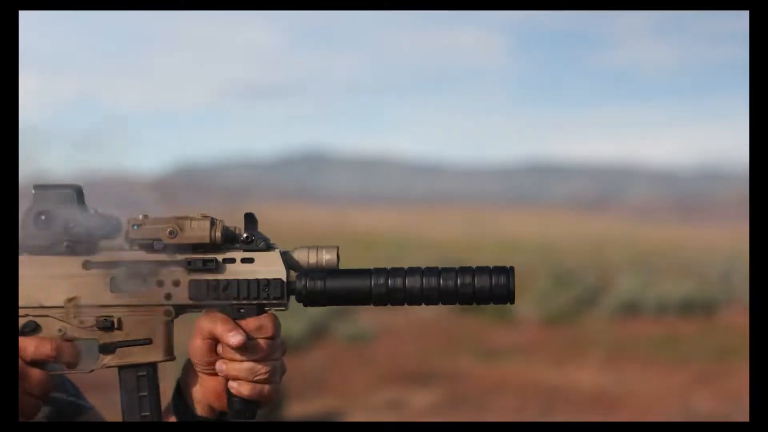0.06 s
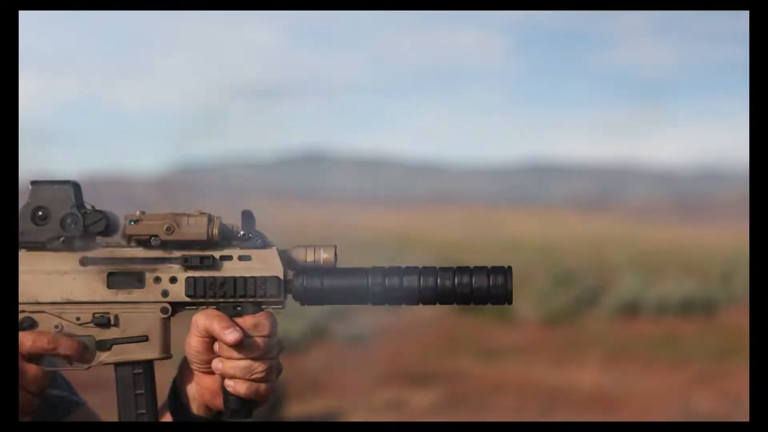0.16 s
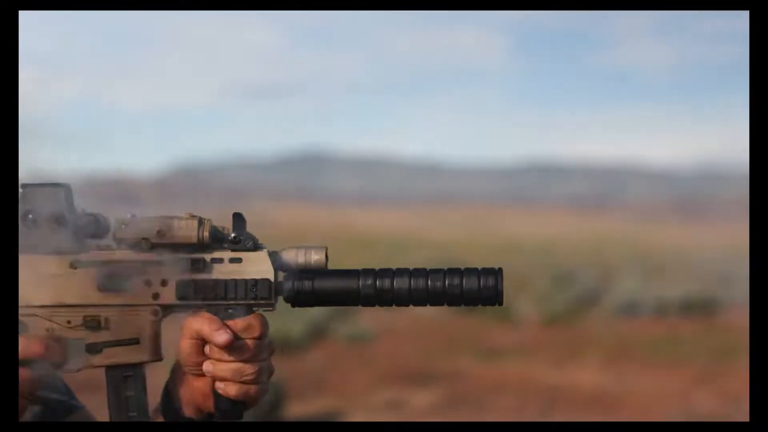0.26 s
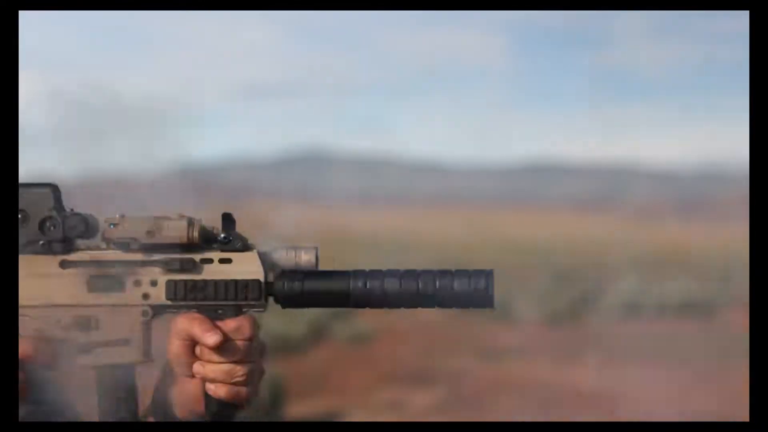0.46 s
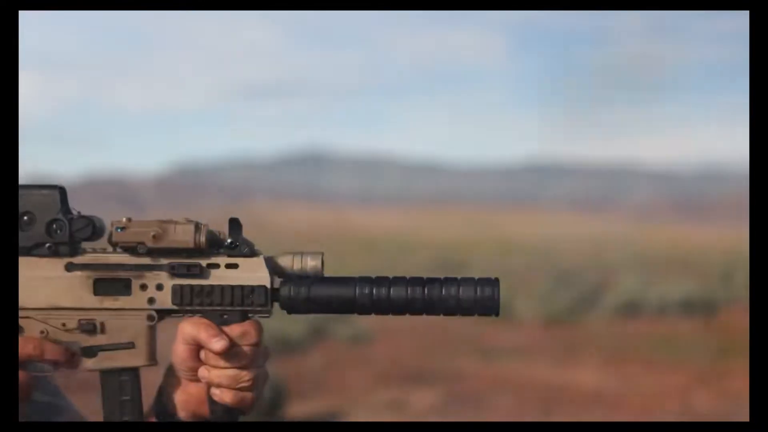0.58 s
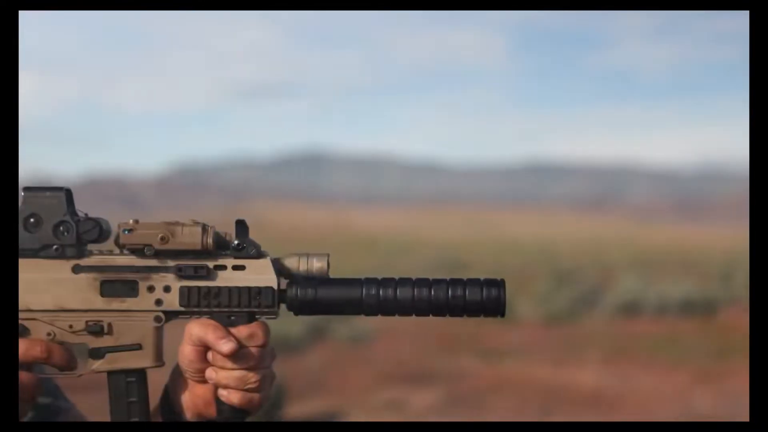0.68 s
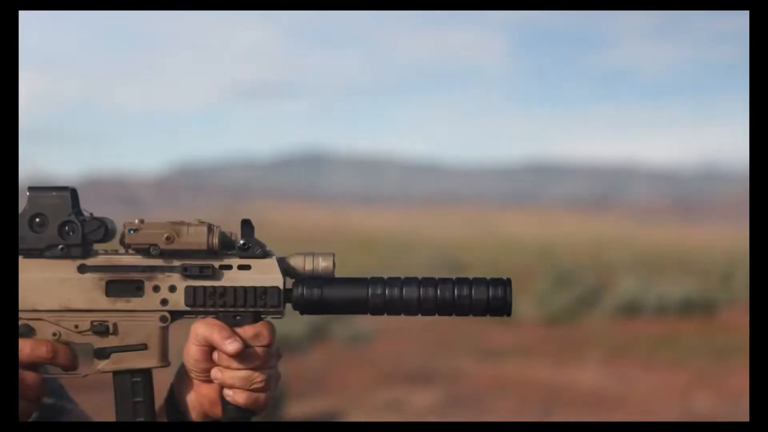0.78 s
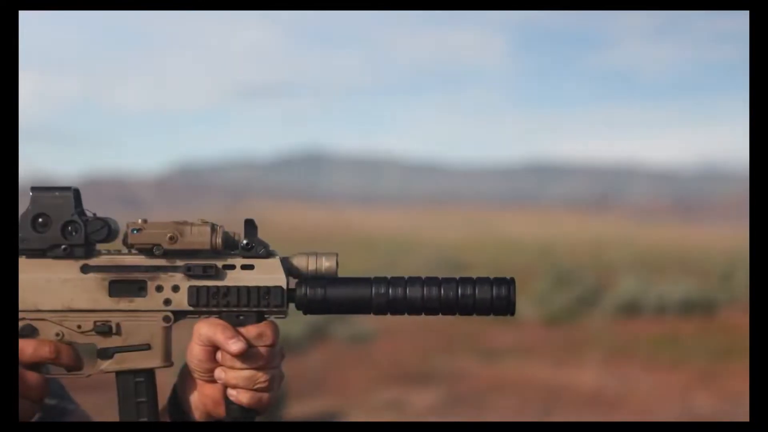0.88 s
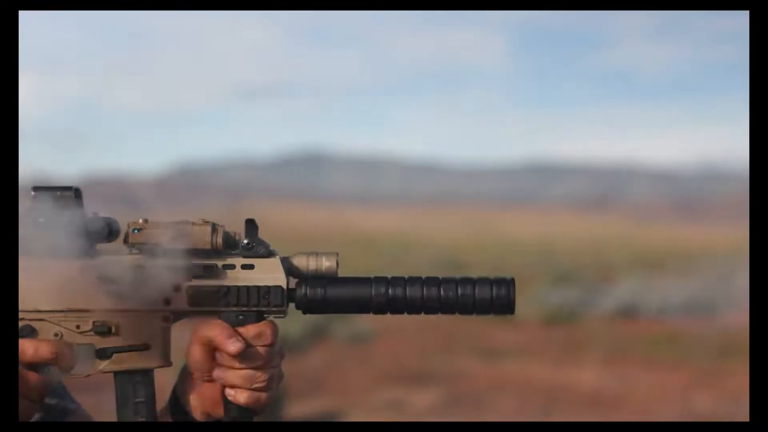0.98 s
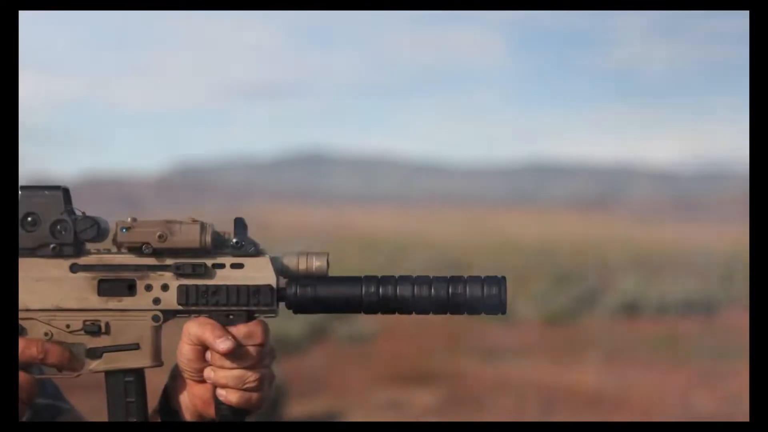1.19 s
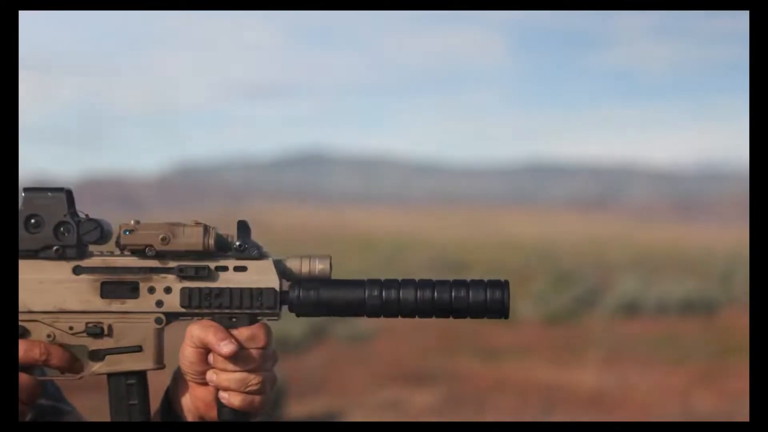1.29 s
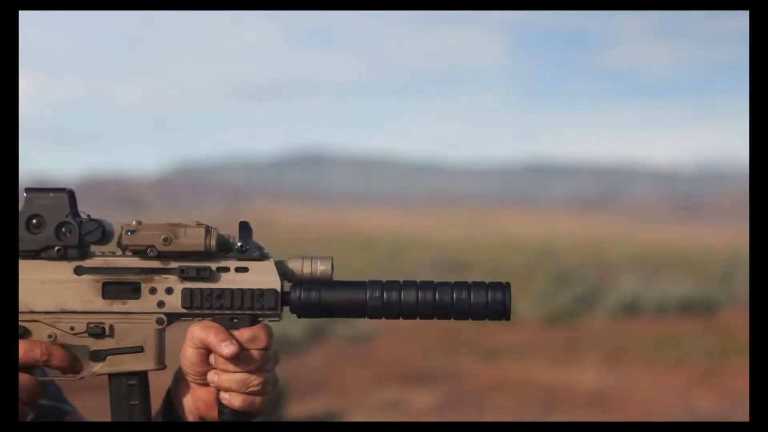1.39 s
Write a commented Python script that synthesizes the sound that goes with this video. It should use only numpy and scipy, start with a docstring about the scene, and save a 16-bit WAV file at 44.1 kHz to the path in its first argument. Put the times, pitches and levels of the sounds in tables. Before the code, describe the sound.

A suppressed rifle fires close by on an open range at about 0.1, 0.3 and 0.5 seconds, then again at 1.0. Each shot is a short, sharp, slightly overloaded pop with a puff of gas, an immediate metallic bolt clack and a faint ground echo. A small steel click comes at 1.2 seconds and a fainter one at 1.4. Low wind rumbles on the microphone throughout.

```python
"""An open range, wind rumbling on the microphone: four close shots from a suppressed self-loading rifle. Each
is a hammer click, a 3 ms blast that rings the suppressor, a puff of venting gas, the bolt sliding and slamming
shut, and a slap about 90 ms later from where the bullet lands downrange. Small steel parts tick between the
shots and twice after the last. The blasts overload the recorder, and its limiter ducks the wind after each."""
import sys
import numpy as np
from scipy import signal
from scipy.fft import rfft, irfft
from scipy.io import wavfile
from scipy.ndimage import uniform_filter1d, minimum_filter1d

SR = 44100
rng = np.random.default_rng(int(sys.argv[2]) if len(sys.argv) > 2 else 0)


def store_pcm(level_fs):
    """Save levels as 16-bit WAV."""
    pcm = np.round(np.clip(level_fs, -1, 1) * 32767).astype(np.int16)
    wavfile.write(sys.argv[1], SR, np.atleast_2d(pcm).T)


N = 63945
TIME = np.arange(N) / SR

# One row a shot: start_s, bark_db, crack_db, thump_db, ring_db, ring_pitch_ratio,
# hammer_db, bolt_delay_s, bolt_db, slap_delay_s, slap_db
SHOT_CUES = [(0.1041, 7.5, 9, -21.5, 4, 1.05, -25.5, .0492, -5.5, 0.086, -31.5),
             (0.309, 7.5, 7.5, 12.5, 2, .97, -24.5, .0490, -2.5, 0.081, -26.5),
             (0.4781, 12, 4.5, 13, 7, 1.0, -28.5, .0488, -2.5, 0.095, -31),
             (1.0422, 3.5, 7.5, 3.5, 4.5, 1.09, -27.5, .0490, -3.5, 0.085, -30)]
# Tone of the open range, for its scatter and its hiss: frequency_hz, relative_db
RANGE_SPECTRUM = [(500, -1), (1200, -1.5), (2200, -2.5), (4300, -0.5), (7000, -9), (12000, -14),
                  (16000, -16.5)]


def muzzle_blast():
    """A short jet barks and cracks over a thump and ringing metal; it all bounces off the ground."""
    # Midrange bark of the jet: frequency_hz, relative_db
    bark_spectrum = [(520, -6), (650, 2.5), (1000, 3), (1500, -3), (1900, -15)]
    # Treble crack of the jet: frequency_hz, relative_db
    crack_spectrum = [(1900, -9), (3000, 3), (4200, -5.5), (5600, 0.5), (6500, -6), (9000, -12),
                      (13500, -8.5), (16000, -23)]
    # Modes of suppressor and receiver: pitch_hz, relative_db, t60_s
    suppressor_modes = [(643, 0.5, 0.015), (1110, -4, 0.011), (1557, -8, 0.048), (2200, -10.5, 0.066),
                        (2816, -7.5, 0.042), (3300, -8.5, 0.0057), (4740, -7.5, 0.051), (5220, -5.5, 0.012)]
    # Faint after-ring of the metal: pitch_hz, level_db, t60_s
    after_ring = [(4340, -58, .65), (12274, -67, .55)]
    jet_s, bark_rise_s, jet_t60_s = .0024, .00049, .006
    bark, crack, blast = noise(bark_spectrum), noise(crack_spectrum), thump()
    for start, bark_db, crack_db, _, ring_db, pitch_ratio, *_ in SHOT_CUES:
        blast += bark * burst(start, bark_db, bark_rise_s, hold_s=jet_s - bark_rise_s, t60_s=jet_t60_s)
        blast += crack * burst(start, crack_db, attack_s=.0001, hold_s=jet_s, t60_s=jet_t60_s)
        blast += struck_metal(start, ring_db, suppressor_modes, pitch_ratio)
        blast += sum(ring(start, hz, db, t60_s) for hz, db, t60_s in after_ring)
    bounce_delay_s, bounce_db = .0045, -19.5
    return blast + from_db(bounce_db) * np.interp(TIME - bounce_delay_s, TIME, blast)


def thump():
    """The low pressure swing of each blast, thinned at the bottom by the microphone."""
    swing = sum(ring(start, hz=172, db=thump_db, t60_s=.014) for start, _, _, thump_db, *_ in SHOT_CUES)
    low_cut = signal.butter(1, 130, "high", fs=SR, output="sos")
    return signal.sosfilt(low_cut, swing)


def venting_gas():
    """Gas puffs from the suppressor and the ejection port after each blast."""
    # Tone of the escaping gas: frequency_hz, relative_db
    gas_spectrum = [(290, -46.5), (500, -12.5), (631, -6.5), (1260, -4.5), (1710, -9), (3110, -3),
                    (12500, -17), (16000, -23.5)]
    puffs = sum(burst(start, db=-3.5, attack_s=.0049, t60_s=.066) for start, *_ in SHOT_CUES)
    return grainy_noise(gas_spectrum) * puffs


def hammer_and_bolt():
    """The hammer falls just before the blast; after it the bolt slides home, slams shut and rattles."""
    # Click of the hammer: frequency_hz, relative_db
    hammer_spectrum = [(530, -50.5), (900, -18), (1790, -8.5), (2330, -4), (3590, -5.5), (6970, -17.5),
                       (14900, -24.5), (16000, -28)]
    # Scrape of the sliding bolt: frequency_hz, relative_db
    slide_spectrum = [(700, -9), (2000, -3.5), (3400, 0.5), (6000, -3.5), (8000, -12), (14000, -15.5),
                      (16000, -25.5)]
    # Bright clack and rattle of the closing bolt: frequency_hz, relative_db
    bolt_spectrum = [(350, -17), (1100, -14.5), (1700, -3.5), (3500, 0), (4200, -8), (5500, 0.5),
                     (6400, -11), (9000, -8.5), (14300, -10.5), (16000, -20)]
    hammer, slide = noise(hammer_spectrum), grainy_noise(slide_spectrum)
    slam, rattle = noise(bolt_spectrum), grainy_noise(bolt_spectrum)
    action = np.zeros(N)
    for start, *_, hammer_db, bolt_delay_s, bolt_db, _, _ in SHOT_CUES:
        shut_s = start + bolt_delay_s
        action += hammer * burst(start - .008, hammer_db, attack_s=.00066, hold_s=.001, t60_s=.0095)
        action += slide * burst(shut_s - .018, db=-20, attack_s=.015, t60_s=.11)
        action += slam * burst(shut_s, bolt_db, attack_s=.0001, hold_s=.0014, t60_s=.015)
        action += rattle * burst(shut_s, bolt_db - 12.5, attack_s=.0001, t60_s=.048)
    return action


def steel_ticks():
    """Very short, dry clicks of small steel parts."""
    # Ticks of the action: start_s, level_db
    tick_cues = [(.2715, -43.5), (.654, -45), (.9845, -50.5), (1.2240, -21.5), (1.4090, -41.5)]
    # Modes of the small parts: pitch_hz, relative_db, t60_s
    part_modes = [(1000, -7, 0.0049), (1712, -6.5, 0.0042), (3540, 0.5, 0.0031), (5670, -7, 0.0012),
                  (9330, -23.5, 0.0028), (12800, -29.5, .002)]
    return sum(struck_metal(start, db, part_modes) for start, db in tick_cues)


def downrange_sounds():
    """A short slap comes back from where the bullet lands, about 90 ms after each shot; the scrub scatters
    faintly."""
    # Tone of the far slap: frequency_hz, relative_db
    slap_spectrum = [(650, -5.5), (900, -1), (1700, -0.5), (3600, -1.5), (5400, -3), (6500, -10.5),
                     (13000, -20), (16000, -33.5)]
    slaps = sum(burst(start + delay_s, slap_db, attack_s=.0008, hold_s=.005, t60_s=.053)
                for start, *_, delay_s, slap_db in SHOT_CUES)
    scatter = sum(burst(start, db=-48.5, attack_s=.026, t60_s=.44) for start, *_ in SHOT_CUES)
    return grainy_noise(slap_spectrum) * slaps + grainy_noise(RANGE_SPECTRUM) * scatter


def wind():
    """Gusty rumble on the microphone and a faint hiss of open air."""
    # Tone of the rumble: frequency_hz, relative_db
    rumble_spectrum = [(12, -33.5), (20, -1), (90, -3.5), (125, -7), (160, -3.5), (264, -8.5), (346, -16),
                       (778, -31.5), (1080, -43.5), (2000, -65), (2600, -93), (4400, -120)]
    # Rise and fall of the gusts: time_s, level_db
    gust_levels = [(0, -37), (.09, -32), (.2, -40.5), (.28, -35), (.45, -36.5), (.62, -37.5), (.8, -36.5),
                   (1.0, -35), (1.18, -37), (1.225, -29.5), (1.28, -38.5), (1.37, -31), (1.45, -39)]
    gusts = from_db(np.interp(TIME, *np.transpose(gust_levels)))
    return noise(rumble_spectrum) * gusts + from_db(-78.5) * noise(RANGE_SPECTRUM)


def from_db(db):
    """Decibels to gain."""
    return 10 ** (np.asarray(db) / 20)


def noise(spectrum):
    """Noise of rms 1 with the given spectrum, falling 12 dB an octave outside it."""
    hz, db = np.transpose(spectrum)
    bins_hz = np.maximum(np.arange(N + 1) * SR / (2 * N), 1)
    tone = from_db(np.interp(np.log(bins_hz), np.log(hz), db))
    skirts = np.minimum(bins_hz / hz[0], 1) ** 2 * np.minimum(hz[-1] / bins_hz, 1) ** 2
    shaped = irfft(rfft(rng.standard_normal(2 * N)) * tone * skirts)[:N]
    return shaped / shaped.std()


def grainy_noise(spectrum, grain_s=.0031, depth_db=3.5):
    """Noise with a rough texture: its level moves to a new random value with every grain."""
    flicker = np.interp(TIME / grain_s, np.arange(N), rng.standard_normal(N))
    return noise(spectrum) * from_db(depth_db * flicker)


def burst(start, db, attack_s, t60_s, hold_s=0):
    """Envelope: linear attack, hold, exponential release."""
    age = TIME - start
    release = np.exp(-np.log(1000) * np.maximum(age - attack_s - hold_s, 0) / t60_s)
    return from_db(db) * np.clip(age / attack_s, 0, 1) * release


def ring(start, hz, db, t60_s):
    """One struck mode: a sine that dies away."""
    age = np.maximum(TIME - start, 0)
    return from_db(db) * np.sin(2 * np.pi * hz * age) * np.exp(-np.log(1000) * age / t60_s)


def struck_metal(start, db, modes, pitch_ratio=1):
    """The modes of a metal part ring together, in alternating polarity."""
    return sum((-1) ** k * ring(start, hz * pitch_ratio, db + mode_db, t60_s)
               for k, (hz, mode_db, t60_s) in enumerate(modes))


def scene():
    """Rifle, range and wind at one microphone."""
    rifle = muzzle_blast() + venting_gas() + hammer_and_bolt() + steel_ticks()
    return (rifle + downrange_sounds() + wind())[None]


def limiter_gain(sound):
    """Gain that dips when the sound is loud, holds, and recovers at a steady rate."""
    threshold_db, max_cut_db = -18, 17.5
    attack_s, hold_s, release_db_per_s = .0035, .025, 281
    level_db = 10 * np.log10(np.maximum(uniform_filter1d(sound ** 2, size=45), 1e-12))
    over_db = np.clip(level_db - threshold_db, 0, max_cut_db)
    half_hold = int(hold_s * SR / 2)
    held_db = -minimum_filter1d(-over_db, 2 * half_hold + 1, origin=half_hold)  # peak of the last hold_s
    recovery_db = release_db_per_s * TIME
    cut_db = np.maximum.accumulate(held_db + recovery_db) - recovery_db
    pole = np.exp(-1 / (attack_s * SR))
    return from_db(-signal.lfilter([1 - pole], [1, -pole], cut_db))


def record(dry):
    """The limiter is too slow for the blast, which clips; a steep filter cuts the very top."""
    clipped = np.clip(dry * limiter_gain(dry[0]), -.95, .95)
    high_cut = signal.cheby2(16, 60, 16400, fs=SR, output="sos")
    return signal.sosfilt(high_cut, clipped)


dry = scene()
out = record(dry)
store_pcm(out)
```